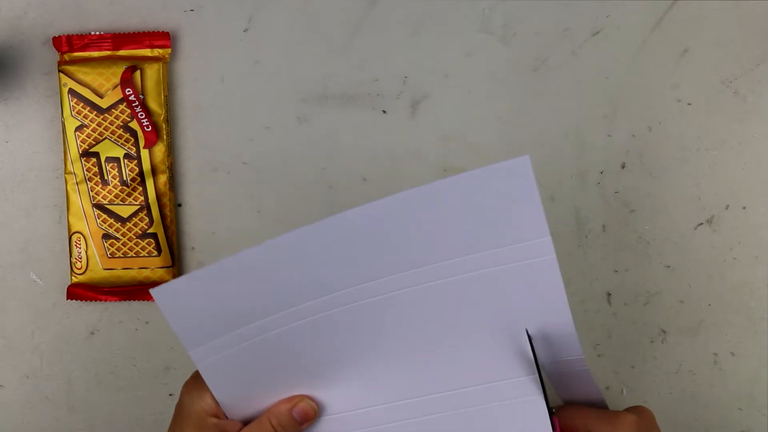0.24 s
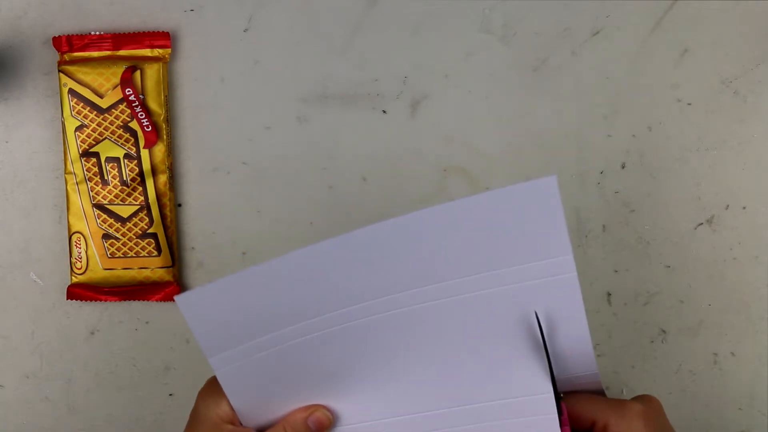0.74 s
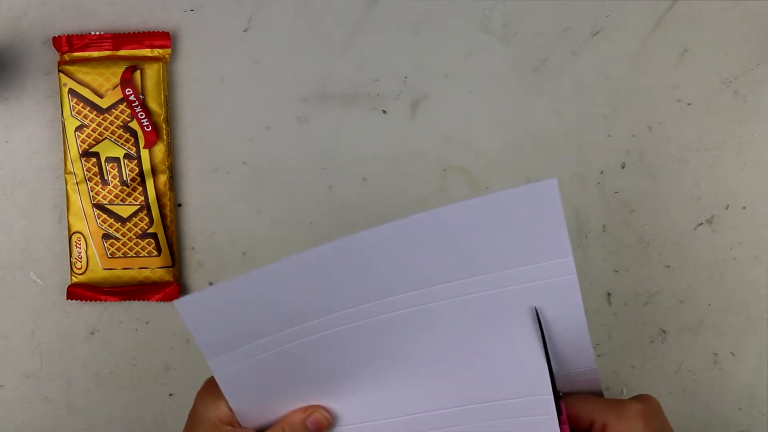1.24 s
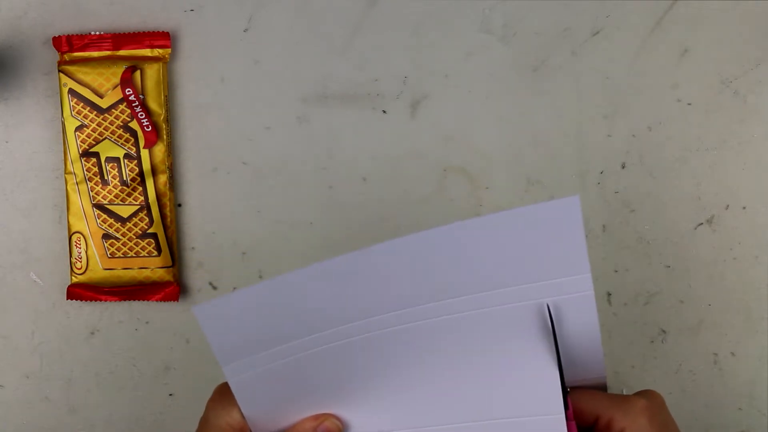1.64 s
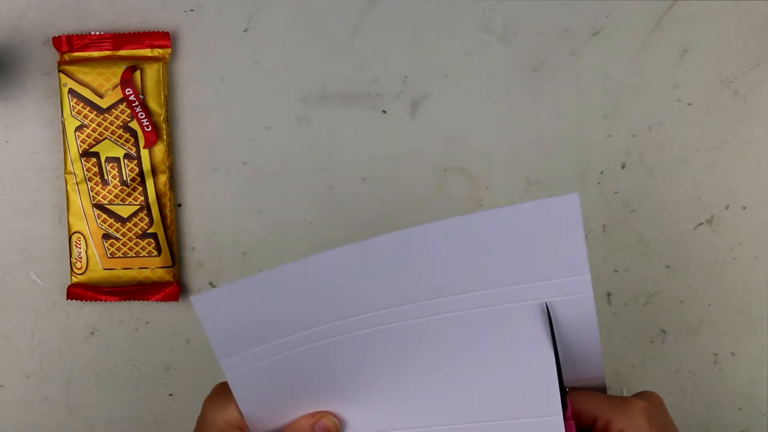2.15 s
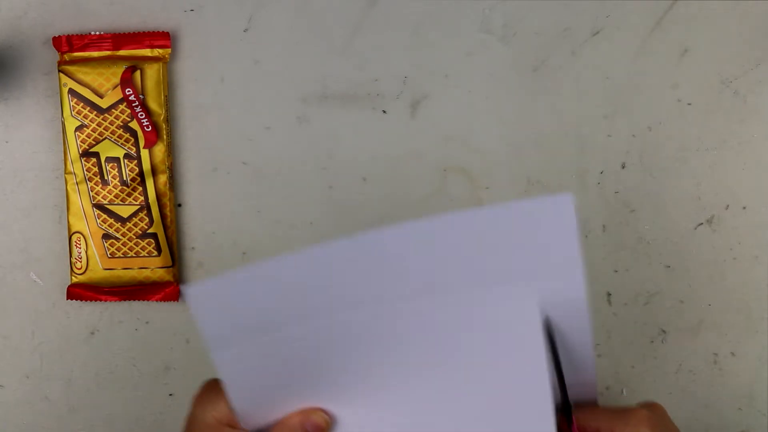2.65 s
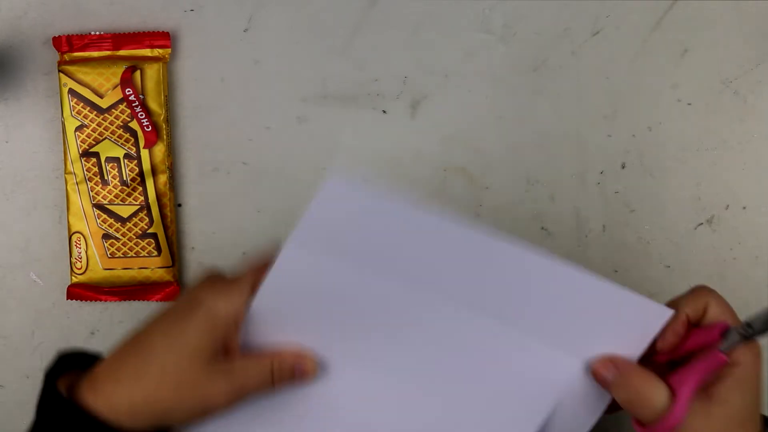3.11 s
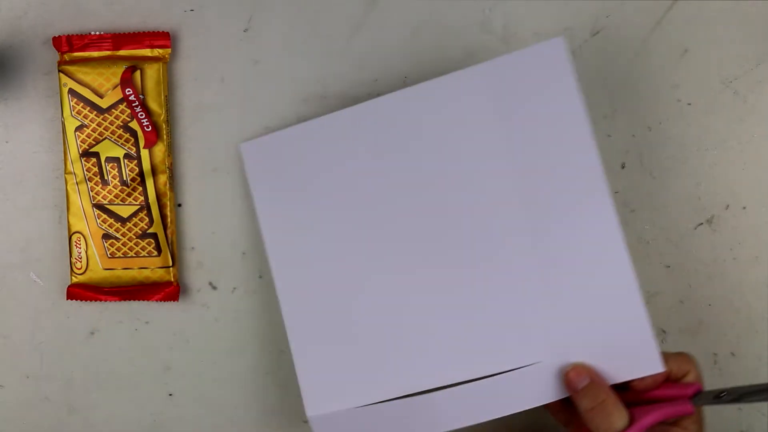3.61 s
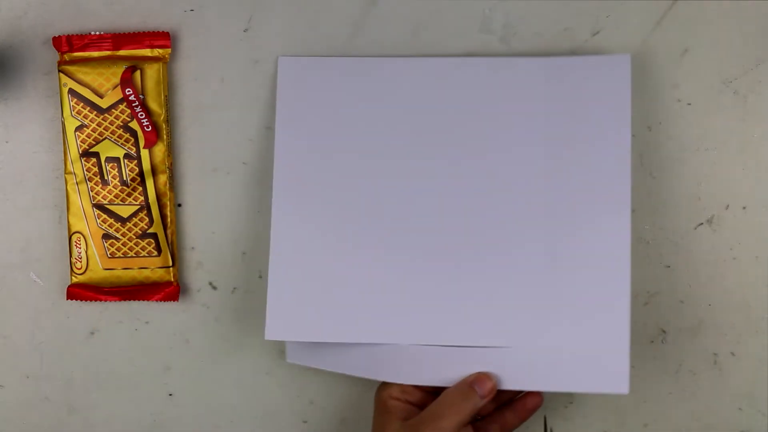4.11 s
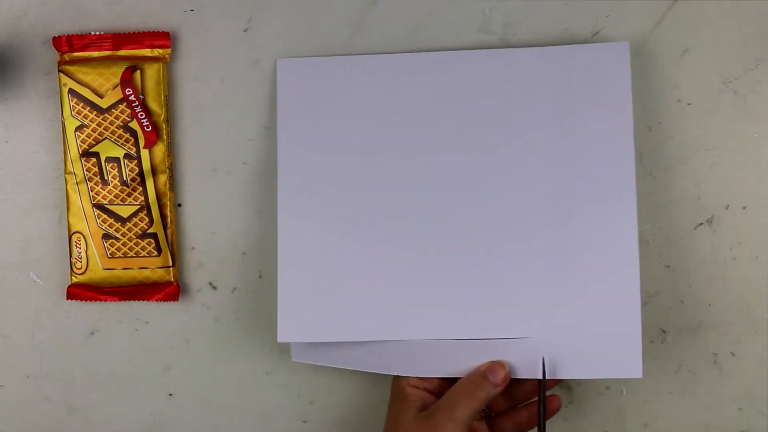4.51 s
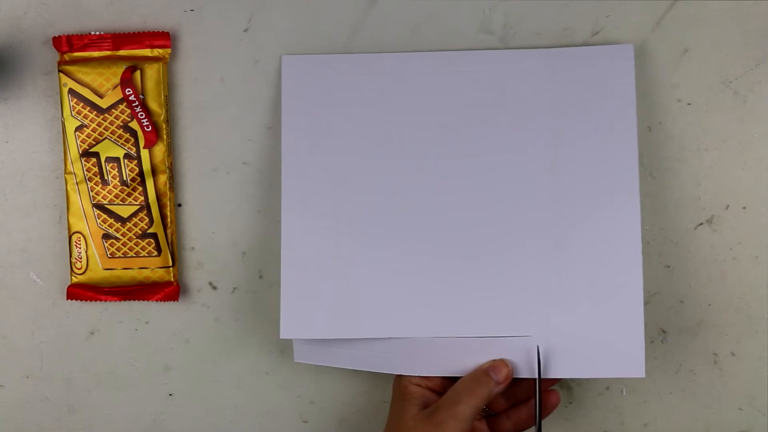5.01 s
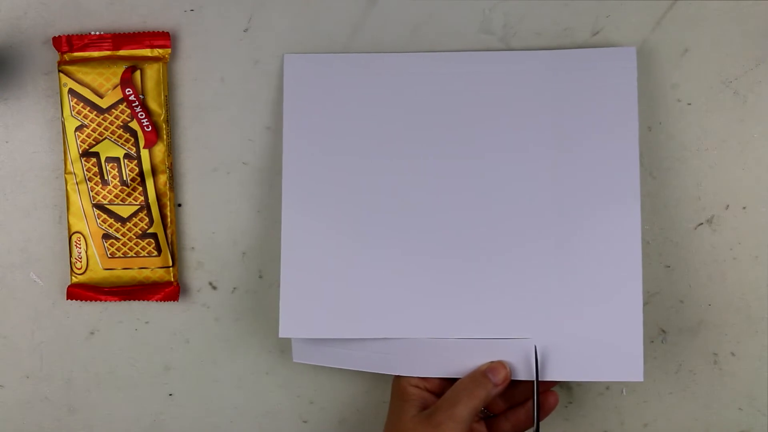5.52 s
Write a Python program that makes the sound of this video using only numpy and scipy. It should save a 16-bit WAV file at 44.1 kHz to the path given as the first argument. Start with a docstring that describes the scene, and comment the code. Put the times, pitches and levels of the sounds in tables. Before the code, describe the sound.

Scissors cut through a sheet of stiff paper, close to the microphone over a table in a small room. A few separate snips lead into a quick crunchy run of snaps, with the blades rasping lightly between cuts. More snips follow, ending on the loudest one. Then hands turn the sheet with soft rustles, a few ticks and a light brush of steel, leaving faint room air and hum.

```python
"""A small room, close up over a table: scissors cut stiff card.
The card gives way in sharp snaps, tiny avalanches of breaking fibres that shake the sheet and ring its
free flap. Between cuts the blades rasp along the slit. Then hands turn the sheet, with soft rustles,
a few ticks and one light brush of steel. A short echo, room air and a faint mains hum sit behind it."""
import sys
import numpy as np
from scipy import signal
from scipy.fft import rfft, irfft, next_fast_len
from scipy.io import wavfile
from scipy.ndimage import uniform_filter1d

SR = 44100
rng = np.random.default_rng(int(sys.argv[2]) if len(sys.argv) > 2 else 0)


def digitize_waveform(pressure):
    """Quantize a signal to 16-bit integers and store it at the path in sys.argv[1].

    Rows of a 2-D input are taken as channels; values are limited to [-1, 1].
    """
    field = np.atleast_2d(pressure).T
    bounded = np.clip(field, -1, 1)
    quanta = np.round(bounded * 32767).astype(np.int16)
    wavfile.write(sys.argv[1], SR, quanta)


N = 254016
TAPS = 4096  # samples in one short response
HZ, T = np.fft.rfftfreq(TAPS, 1 / SR), np.arange(TAPS) / SR

# the card giving way at the blades: start_s, strength_db, flap_hz, tear_s, crunch_offset_db
CARD_SNAPS = [(.089, -28.5, 673, 0.0052, 3.5), (.139, -40, 704, 0.0014, -4), (0.339, -26.5, 935, .006, -4),
              (.392, -19.5, 593, 0.0039, 3.5), (.79, -20, 710, 0.0028, 1.5), (.807, -15, 696, 0.022, 6.5),
              (.833, -20, 680, .007, 9), (.864, -22.5, 703, .006, 6), (0.898, -24.5, 943, .008, 8),
              (.93, -20, 688, 0.0035, 7), (.955, -18, 746, 0.0055, 5.5), (1.011, -17, 714, 0.011, 9.5),
              (1.045, -17.5, 723, 0.0053, -1), (1.06, -14.5, 675, 0.0038, 6), (1.095, -9.5, 698, .008, 6),
              (1.117, -13, 682, 0.01, 7.5), (1.148, -10.5, 693, .015, 9), (1.788, -16, 840, 0.0072, 6),
              (1.82, -25, 617, 0.0076, 4), (1.963, -12.5, 558, 0.006, 6), (1.988, -23, 512, 0.013, 11.5),
              (2.007, -26, 462, .005, 9), (2.157, -14, 486, 0.0051, 5.5), (2.219, -20, 478, .006, 7),
              (2.325, -14.5, 695, 0.0038, 6), (2.427, -4, 663, 0.006, 3)]
# tone of the shaken sheet, its crushed layers and its parting fibres: freq_hz, gain_db
BODY_EQ = [(40, -31), (120, -30.5), (210, -15), (320, -13), (440, -0.5), (560, 3), (750, 3), (960, 2),
           (1300, -10), (2000, -23), (5000, -54.5), (16000, -70)]
CRUNCH_EQ = [(300, -33), (900, 2), (1400, 2), (1750, 4.5), (2050, 9), (2400, 9.5), (2800, -6.5),
             (3500, -0.5), (5000, -27.5), (16000, -67)]
FIZZ_EQ = [(500, -40), (2000, 2.5), (3600, 4), (4800, -1), (6300, -13.5), (8300, -8.5), (11000, -19.5),
           (16000, -34.5)]
# fizz against each snap, strongest near the blade tips: time_s, offset_db
FIZZ_RIDE = [(.39, -1), (.8, -12), (1.05, -10), (1.15, -0.5), (2, -5), (2.2, 3.5), (2.43, 7)]
# blades sliding along the slit: start_s, length_s, level_db, resonance_hz
BLADE_SLIDES = [(.005, 0.065, -67, 706), (.092, 0.082, -45.5, 870), (.245, 0.17, -57, 700),
                (.376, 0.024, -40.5, 3780), (.384, .018, -30, 1110), (.402, 0.0205, -36.5, 1120),
                (.435, 0.14, -43, 3630), (.565, 0.069, -46.5, 3840), (1.3, .026, -47, 1110),
                (1.326, 0.022, -34.5, 2000), (1.345, 0.093, -37.5, 1480), (2.668, 0.035, -49.5, 3930),
                (2.696, .077, -44, 2195)]
# hands brushing and flexing the sheet: start_s, length_s, level_db, resonance_hz
HAND_RUSTLES = [(3.088, 0.044, -51, 1830), (3.145, .04, -49, 450), (3.15, 0.092, -53, 2400),
                (3.194, 0.026, -45, 2250), (3.2, 0.12, -55.5, 273), (3.295, 0.039, -57.5, 3000),
                (3.528, 0.029, -52, 1120), (3.628, 0.046, -55.5, 1510), (3.693, 0.029, -51.5, 1150),
                (3.744, .034, -45.5, 1900), (3.778, 0.07, -52.5, 1800), (3.85, 0.078, -58.5, 1490),
                (3.917, .016, -47.5, 1300), (3.981, 0.033, -45, 1220)]
# the sheet slipping through the fingers as it turns: start_s, length_s, level_db, resonance_hz
SHEET_TURN = (2.5, 1.0, -68, 2300)
# bare blades brushing each other: start_s, length_s, level_db, resonance_hz
STEEL_SCRAPES = [(3.692, .055, -59, 10500)]
# tone of each kind of friction: freq_hz, gain_db
SLIDE_EQ = [(60, -21.5), (210, -9), (330, 1.5), (450, 9), (1050, 6), (1550, -2), (2300, 0), (2900, -1),
            (3900, -4.5), (5000, -11.5), (6500, -18), (8500, -19.5), (12000, -32), (16000, -44.5)]
RUSTLE_EQ = [(60, -14.5), (200, 2.5), (400, 5), (800, 3.5), (1900, -2.5), (2800, -2), (4500, -5.5),
             (7000, -12), (11000, -21.5), (16000, -30)]
STEEL_EQ = [(2000, -13), (8000, -12), (10500, -2), (12500, -10), (15000, -5)]
# scissor knocks and card-edge ticks: start_s, level_db, pitch_hz, t60_s, click_gain
CONTACTS = [(.392, -39, 218, 0.08, .02), (.394, -23, 1110, 0.0036, 0.4), (1.327, -27, 2020, 0.0023, 0.45),
            (1.361, -18.5, 1080, 0.0014, 0.86), (2.43, -31.5, 253, 0.041, .02),
            (3.144, -31, 7240, 0.00052, 0.99), (3.535, -41.5, 1046, 0.039, 0.214),
            (3.8123, -22, 3780, 0.0023, 0.12), (3.917, -26.5, 1350, 0.0054, 0.07)]
# tone of the diffuse echo: freq_hz, gain_db
ECHO_EQ = [(150, 1), (600, -2.5), (1400, 1.5), (3500, -1.5), (9000, 5)]
# decay of the echo: freq_hz, t60_s
ECHO_DECAY = [(200, 0.26), (550, 0.19), (1400, 0.25), (2300, 0.24), (3700, 0.24), (10000, 0.19)]
# standing waves between table and walls: pitch_hz, level_db, t60_s
STANDING_WAVES = [(471.8, -0.5, 0.14), (641.6, 5.5, 0.16), (697, -2.5, 0.18), (807, -2, 0.38),
                  (946, 7, 0.21), (1013, 4.5, 0.3), (1102, -2.5, 0.29), (1248, 6.5, 0.2), (1629, 6, 0.17),
                  (1790, 2, 0.17), (2005, 3, 0.096), (2224, 1, 0.092), (2310, -0.5, 0.11),
                  (2540, -3.5, 0.6)]
# left-right likeness of the echo and the room air: freq_hz, correlation
ECHO_LIKENESS = [(200, 1), (700, 0.98), (1400, 0.78), (3000, 0.073), (7000, 0.021)]
AIR_LIKENESS = [(60, 0.9), (130, 0.34), (290, 0.21), (1400, 0.01), (4000, 0)]
# tone of the room air: freq_hz, gain_db
AIR_EQ = [(20, -40.5), (33, -25), (48, -14), (70, -16), (110, -16.5), (190, -13.5), (300, -16.5),
          (600, -18), (1300, -21), (3000, -23.5), (7000, -27), (12000, -31), (16000, -34.5)]
# mains harmonics: pitch_hz, rms_db
HUM_PARTIALS = [(100, -66.5), (200, -79), (300, -95)]


def snaps(body_db=6, flap_db=7.5, flap_t60_s=0.023, flap_hold=2.06, flap_rise_s=0.0016):
    """Each tear shakes the sheet, rings its free flap, crushes its layers and sprays a little treble."""
    out = np.zeros((2, N))
    body, crunch, fizz = (unit(causal(read(eq, HZ)))[None] for eq in (BODY_EQ, CRUNCH_EQ, FIZZ_EQ))
    for start_s, db, flap_hz, tear_s, crunch_db in CARD_SNAPS:
        # a long tear keeps the flap going for longer
        flap = ring(flap_hz, flap_t60_s + flap_hold * tear_s) * (1 - np.exp(-T / flap_rise_s))
        add(out, start_s, amp(db + flap_db) * unit(flap))
        add(out, start_s, amp(db + body_db) * burst(body, tear_s, lead=0.32, width=0.04))
        add(out, start_s, amp(db + crunch_db) * burst(crunch, tear_s, lead=0.17, width=0.24))
        # single fibres go on parting after the layers have given way
        fizz_db = np.interp(start_s, *np.transpose(FIZZ_RIDE))
        add(out, start_s, amp(db + fizz_db) * burst(fizz, tear_s * 1.37, lead=0.078, width=0.39))
    return bend(out)


def burst(response, tear_s, lead, width):
    """A tear coloured by one response; the sheet radiates it differently to each side."""
    pair = tear(tear_s, lead) + width * np.array([[1], [-1]]) * tear(tear_s, 0)
    return signal.fftconvolve(unit(pair), response)


def tear(tear_s, lead, abrupt=1.33):
    """A first break of size lead and a dying avalanche of smaller ones, flat in spectrum."""
    decay = np.exp(-(T / max(tear_s, 5e-4)) ** abrupt)
    breaks = unit(fibres(TAPS, per_s=14000, spread_db=1.0) * decay)
    breaks[0] += lead
    power = uniform_filter1d(abs(rfft(breaks)) ** 2, size=36)
    flatten = causal(-10 * np.log10(power + 1e-9))
    return unit(signal.fftconvolve(breaks, flatten)[:TAPS])


def fibres(size, per_s, spread_db):
    """A crackle of tiny fibre breaks of uneven size, rms 1."""
    sizes = rng.standard_normal(size) * amp(spread_db * np.minimum(rng.exponential(1, size), 4))
    breaking = rng.random(size) < per_s / SR
    return unit(sizes * breaking) * np.sqrt(size)


def bend(x, travel=0.04955):
    """Bending waves in a sheet: speed grows as the root of frequency, so the bass arrives last."""
    size = next_fast_len(N + TAPS)
    hz = np.fft.rfftfreq(size, 1 / SR)
    return irfft(rfft(x, size) * np.exp(-4j * np.pi * travel * np.sqrt(hz)), size)[:, :N]


def slides(drag_s=0.032, drag_db=-33, drag_hz=1630):
    """The blades rasp along the slit, and drag on a little after each snap."""
    drags = [(start_s, drag_s, db + drag_db, drag_hz) for start_s, db, *_ in CARD_SNAPS]
    return strokes(BLADE_SLIDES + drags, SLIDE_EQ, per_s=2200, spread_db=0.36, resonance_db=6.5,
                   octaves=0.16, swell=0.22, sag_db=2.5, tilt_db=4, pivot_hz=1520, width=0.51)


def rustles():
    """Fingers rub and turn the sheet: soft, grainy friction with a broad resonance."""
    return strokes(HAND_RUSTLES + [SHEET_TURN], RUSTLE_EQ, per_s=5000, spread_db=1.8, resonance_db=7,
                   octaves=0.72, swell=0.29, sag_db=2, tilt_db=2.5, pivot_hz=2200, width=0.65)


def scrapes():
    """Steel brushes steel: a thin, fast-fading hiss with a narrow blade resonance."""
    return strokes(STEEL_SCRAPES, STEEL_EQ, per_s=5000, spread_db=-3, resonance_db=12,
                   octaves=0.04, swell=0.23, sag_db=23, tilt_db=0, pivot_hz=10500, width=0.57)


def strokes(rows, eq, per_s, spread_db, resonance_db, octaves, swell, sag_db, tilt_db, pivot_hz, width,
            uneven_db=1.5, catch_s=0.008):
    """Friction: dense tiny catches excite a resonance while the pressure swells and sags."""
    out = np.zeros((2, N))
    for start_s, length_s, db, hz in rows:
        t = np.arange(int(length_s * SR)) / SR
        rise_s = max(swell * length_s, 1e-3)
        pressure = np.minimum(t / rise_s, 1) * amp(-sag_db * np.maximum(t - rise_s, 0) / length_s)
        # the surfaces catch and let go unevenly
        catches = np.arange(0, length_s + catch_s, catch_s)
        pressure *= amp(uneven_db * np.interp(t, catches, rng.standard_normal(len(catches))))
        octaves_away = np.log2((HZ + 20) / hz)
        peak_db = resonance_db / (1 + (octaves_away / octaves) ** 2)
        # with tilt, a higher resonance makes a brighter rasp
        bright_db = tilt_db * np.log2(hz / pivot_hz) * np.clip(octaves_away, -0.4, 4)
        body = unit(causal(read(eq, HZ) + bright_db + peak_db))
        mid = signal.fftconvolve(fibres(len(t), per_s, spread_db) * pressure, body)
        side = signal.fftconvolve(fibres(len(t), per_s, spread_db) * pressure, body)
        side = width * low_cut(side, hz=3500)
        add(out, start_s, amp(db) * np.array([mid + side, mid - side]))
    return out


def ticks():
    """A dry click with a brief ring of whatever was touched."""
    out = np.zeros(N)
    click = causal(read(RUSTLE_EQ, HZ))
    click /= abs(click).max()
    for start_s, db, hz, t60_s, click_gain in CONTACTS:
        add(out, start_s, amp(db) * (ring(hz, t60_s) + click_gain * click))
    return out


def room(x, build_s=0.003, diffuse_db=-4, standing_db=-1):
    """A small room: a diffuse echo whose bands die at their own speed, plus standing waves."""
    hz, t, bands = signal.stft(noise_pair(ECHO_LIKENESS, ECHO_EQ, size=SR // 2), SR, nperseg=256)
    decay = amp(-60 * t / read(ECHO_DECAY, hz)[:, None])
    tail = signal.istft(bands * decay, SR, nperseg=256)[1]
    age = np.arange(tail.shape[1]) / SR
    tail *= np.minimum(age / build_s, 1) ** 2
    # flatten the tail, then give it the tone of the walls
    power = uniform_filter1d((abs(rfft(tail, TAPS)) ** 2).mean(0), size=11)
    walls = causal(read(ECHO_EQ, HZ) + diffuse_db - 10 * np.log10(power))
    tail = signal.fftconvolve(tail, walls[None])[:, :len(age)]
    for mode_hz, db, t60_s in STANDING_WAVES:
        rate = np.log(1000) / t60_s
        mode = np.exp(-rate * age) * np.cos(2 * np.pi * mode_hz * age)
        tail += amp(db + standing_db) * 2 * rate / SR * mode
    return signal.fftconvolve(x.mean(0)[None], tail, axes=1)[:, :N]


def background(air_db=-60.5, waver=0.055):
    """A bed of steady room air and slightly wavering mains hum."""
    t = np.arange(N) / SR
    air = unit(noise_pair(AIR_LIKENESS, AIR_EQ, size=N)) * np.sqrt(N)
    drift = np.interp(t, np.linspace(0, t[-1], 40), rng.standard_normal(40))
    hum = sum(np.sqrt(2) * amp(db) * np.sin(2 * np.pi * (hz * t + rng.random()))
              for hz, db in HUM_PARTIALS)
    return amp(air_db) * air + hum * (1 + waver * drift)


def noise_pair(likeness, eq, size):
    """Coloured stereo noise whose width depends on frequency."""
    hz = np.fft.rfftfreq(size, 1 / SR)
    same = np.clip(read(likeness, hz), -1, 1)
    mid, side = rfft(rng.standard_normal((2, size))) * np.sqrt([(1 + same) / 2, (1 - same) / 2])
    return irfft(np.array([mid + side, mid - side]) * amp(read(eq, hz)), size)


def ring(hz, t60_s):
    """One dying mode."""
    return np.sin(2 * np.pi * hz * T) * np.exp(-np.log(1000) * T / max(t60_s, 1e-4))


def causal(db):
    """The causal impulse response with this EQ curve on the HZ grid."""
    log_gain = np.log(amp(np.r_[db, db[-2:0:-1]]))
    return np.fft.ifft(np.exp(np.conj(signal.hilbert(log_gain)))).real


def low_cut(x, hz, order=1):
    """Rolls off everything below hz."""
    return signal.lfilter(*signal.butter(order, hz, "high", fs=SR), x)


def read(points, hz):
    """Reads a curve on a log frequency axis."""
    freqs, values = np.transpose(points)
    return np.interp(np.log(hz + 1), np.log(freqs), values)


def amp(db):
    """Decibels to gain."""
    return 10 ** (np.asarray(db) / 20)


def unit(x):
    """Scales a sound to energy 1 per channel."""
    return x / np.sqrt(np.sum(x ** 2, -1, keepdims=True) + 1e-20)


def add(mix, start_s, sound):
    """Lays a sound into the mix."""
    part = mix[..., round(start_s * SR):][..., :sound.shape[-1]]
    part += sound[..., :part.shape[-1]]


def scene(lean=0.079, baffle_hz=115):
    """Cutting and handling in the room; the treble leans a little to the right."""
    friction = slides() + rustles() + scrapes()
    # air slips round the edge of a small sheet, so it radiates little bass
    near = low_cut(snaps() + friction + ticks(), baffle_hz, order=2)
    treble_pan = lean * np.array([[-1], [1]]) * low_cut(near, hz=1500)
    return near + treble_pan + room(near) + background()


def record(dry, ceiling_db=-7, high_cut_hz=15900):
    """The microphone rounds off the sharpest peaks; a steep high cut trims the top."""
    rounded = amp(ceiling_db) * np.tanh(dry / amp(ceiling_db))
    high_cut = signal.firwin(511, high_cut_hz, window=("kaiser", 9), fs=SR)
    return signal.oaconvolve(rounded, high_cut[None], "same")


dry = scene()
out = record(dry)
digitize_waveform(out)
```